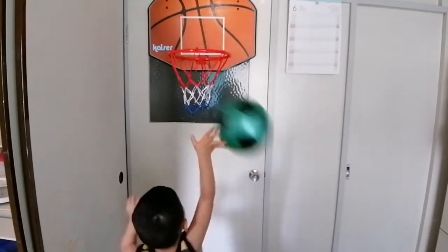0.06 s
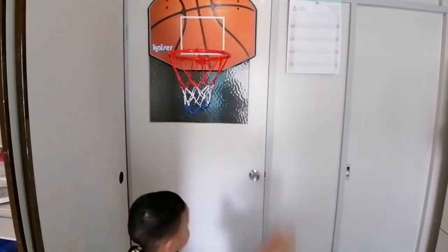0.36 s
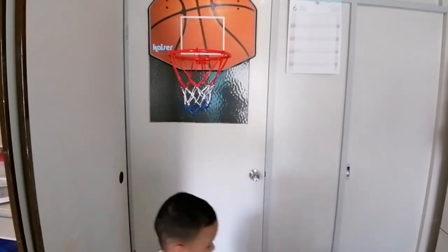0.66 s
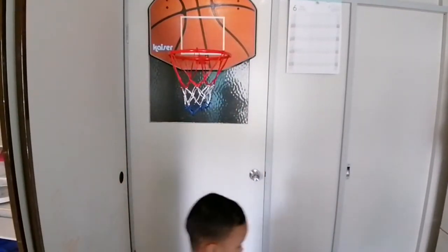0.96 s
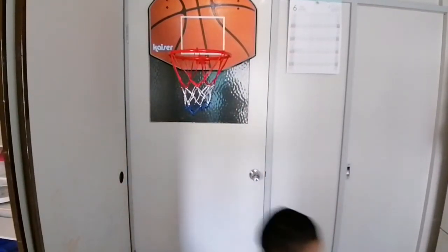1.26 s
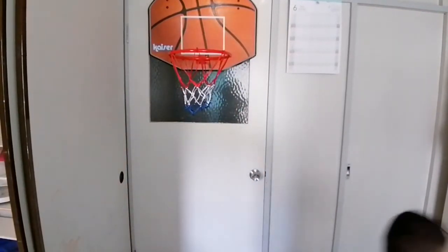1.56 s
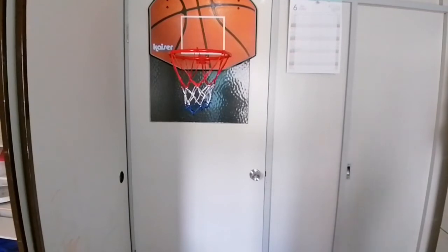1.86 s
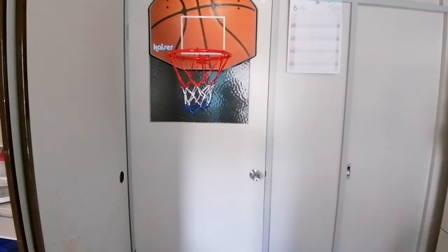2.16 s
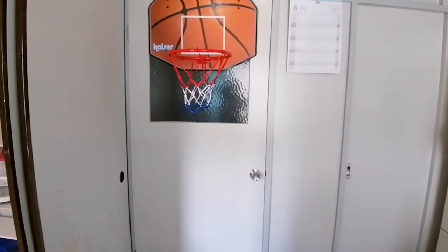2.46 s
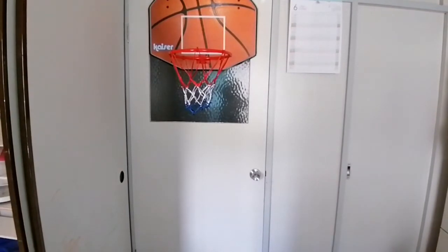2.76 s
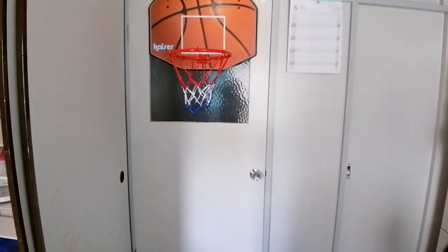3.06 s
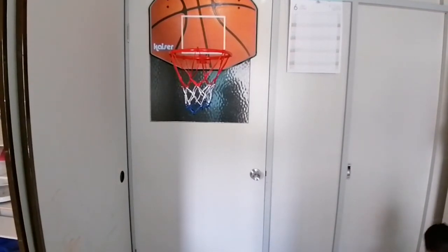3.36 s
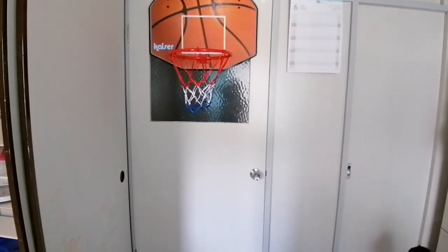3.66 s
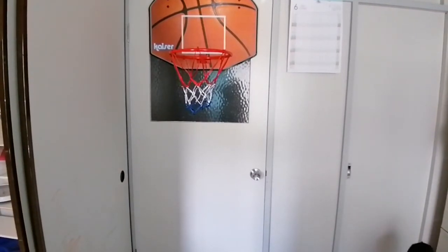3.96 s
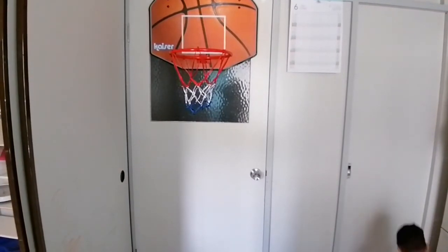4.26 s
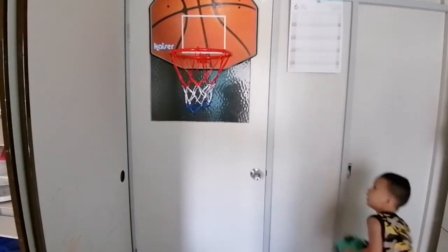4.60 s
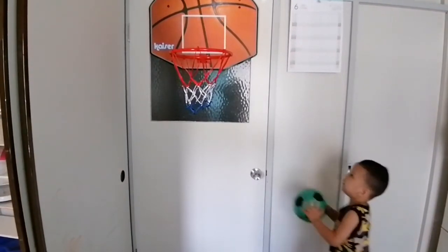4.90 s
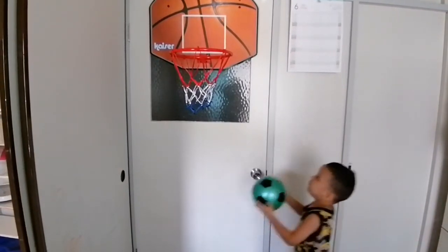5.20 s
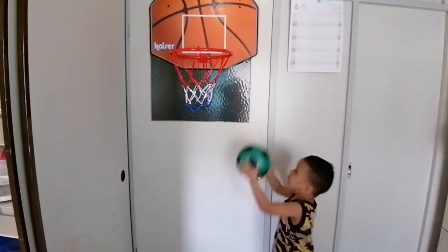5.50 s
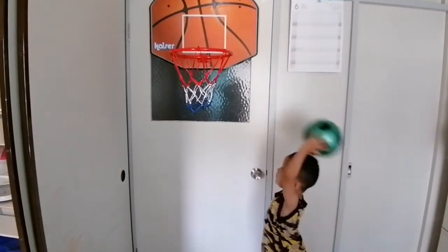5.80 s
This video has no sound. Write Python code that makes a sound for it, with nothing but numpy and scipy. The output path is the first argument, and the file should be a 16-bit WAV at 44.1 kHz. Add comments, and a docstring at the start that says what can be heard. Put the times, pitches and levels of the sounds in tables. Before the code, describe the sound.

A toy backboard knocks against a door, an inflatable ball bounces, and a child's bare footsteps and ball pats follow indoors.

```python
"""A small hard room, heard in stereo: a child plays with a light inflatable ball and a toy hoop on a door.
The ball brushes off the rim, leaves the backboard knocking on the door and bounces three times.
Bare feet thud, scuff and stamp after it, cloth rustles, and hands gather the ball and pat it.
Slaps reach the microphone mostly off the walls; the weight behind them sets the room's low modes booming.
A few dry ticks sound close by, and still air lies under it all."""
import sys
import numpy as np
from scipy import signal
from scipy.fft import rfft, irfft, next_fast_len
from scipy.io import wavfile
from scipy.ndimage import uniform_filter1d

SR = 44100
rng = np.random.default_rng(int(sys.argv[2]) if len(sys.argv) > 2 else 0)


def put_to_file(sound):
    """Save the sound as 16-bit audio at rate SR, in the file named by the first command-line argument."""
    columns = np.atleast_2d(sound).T  # one column per channel
    safe = np.clip(columns, -1, 1)
    whole_steps = np.round(safe * 32767)
    wavfile.write(sys.argv[1], SR, whole_steps.astype(np.int16))


N = 261907
TAIL = 32768   # samples for one contact to die away
TIME, AGE = np.arange(N) / SR, np.arange(TAIL) / SR   # s into the scene, s into a contact
WEIGHT_AFTER_S = 0.01797   # the weight arrives after the heel
SWING_CENTRE_S = 0.02   # from the start of a pressure swing to its middle

# decay of the walls' reflections: f/Hz, t60/s
ROOM_T60 = [(60, 0.56), (160, 0.42), (420, 0.36), (1100, 0.28), (2900, 0.41), (7700, 0.27), (14000, 0.32)]
# low modes of floor, door and room, then of the air inside the ball: f/Hz, level/dB, t60/s
ROOM_MODES = [(64, -14, .6), (74, -15, 0.44), (100.2, -2, 0.8), (124.4, -35, .45), (146.4, -16, 0.75),
              (171.6, -2.5, 0.3), (248, -34, 0.62), (330, -19, 1), (372, -57.5, .35)]
BALL_MODES = [(1500, 10.5, 0.061), (2420, -26, .1), (3340, -13, .08)]
# hollow ring of floor and door under a blow: f/Hz, width/Hz, lift/dB
HOLLOW_RING = [(386, 40, -1.5), (470, 29, 2), (569, 10, 6.5), (693, 6.7, 5), (946, 14, 4), (1019, 46, 4.5),
               (1286, 55, -5), (1696, 46, 3.5), (2420, 39, 2.5), (2540, 31, 5.5), (2883, 62, 4),
               (2834, 70, 2)]
# stereo width at the microphone: f/Hz, side minus mid/dB
MIC_WIDTH = [(50, -13), (150, -12.5), (280, -9.5), (500, -6.5), (1000, 0), (16000, 0.5)]
# balance at the microphone (pan is left minus right throughout): f/Hz, pan/dB
MIC_BALANCE = [(50, 0.5), (150, -3), (400, -1), (1000, -0.5), (2200, 0), (5000, 0), (14000, -1)]
# spectra of still air, cloth and sliding contacts: f/Hz, level/dB
AIR_COLOUR = [(15, -25), (25, -2), (53, -2.5), (70, -24.5), (92, -5), (301, -19.5), (326, -14), (516, -20),
              (754, -17.5), (936, -21), (1370, -19), (1480, -24), (1840, -21), (10400, -43.5),
              (16000, -58.5)]
RUSTLE_COLOUR = [(1000, -17), (3000, 7), (5500, 0.5), (7000, 4.5), (8000, -7), (9300, 5.5), (11000, -0.5),
                 (12500, -22), (16000, -17)]
RUB_COLOUR = [(150, -18), (500, 0.5), (1200, -17), (1370, -0.5), (1480, 9.5), (1650, -9.5), (3800, -15),
              (5000, -15.5), (6200, -23), (10000, -34), (14000, -54)]
SCUFF_COLOUR = [(80, -17), (300, 2), (650, 4), (1000, -17), (1450, -12), (2500, -23), (5500, -37),
                (10000, -26), (16000, -71)]
RIM_COLOUR = [(60, -4), (250, -5), (550, -1.5), (900, -8.5), (1500, -16), (3000, -20.5), (7000, -32.5),
              (10500, -30.5), (13000, -50), (16000, -58)]
# spectra of sharp contacts: f/Hz, level/dB
HAND_COLOUR = [(40, -14), (105, 4), (240, 4.5), (340, 1.5), (500, -13), (1000, -19), (1800, -28.5),
               (3200, -32), (6000, -41), (10500, -47.5), (12500, -58), (16000, -73)]
HEEL_COLOUR = [(60, -4.5), (200, 4.5), (380, -2.5), (600, -10), (1000, -17.5), (1600, -22.5), (3000, -24),
               (6000, -35), (10500, -35), (12500, -44), (16000, -64)]
SOLE_COLOUR = [(60, 12.5), (250, 4.5), (420, -4), (680, -9.5), (1300, -2.5), (2100, -7.5), (3100, -10.5),
               (4000, -18.5), (5200, -19), (7000, -25), (10500, -23.5), (12500, -38), (16000, -44.5)]
BALL_COLOUR = [(30, -1), (100, 3.5), (170, -2.5), (270, -0.5), (450, -4.5), (700, -6.5), (1200, -7.5),
               (2600, -9.5), (5000, -16.5), (10000, -21), (12500, -29), (16000, -48)]
PLASTIC_COLOUR = [(100, 5), (350, 8), (700, 1.5), (1400, -5.5), (2300, -2), (3500, -12), (5200, -11),
                  (7000, -13), (10500, -21.5), (13000, -31), (16000, -47)]
# course of each sliding contact: t/s, level/dB
BALL_RUB = [(3.3, -60), (3.335, -51), (3.365, -47), (3.41, -51.5), (3.46, -62)]
FOOT_SCUFF = [(2.485, -55), (2.512, -40.5), (2.53, -39.5), (2.55, -52), (2.58, -47), (2.65, -67),
              (2.73, -89)]
RIM_BRUSH = [(.008, -76), (.02, -42), (.09, -43), (.125, -41), (.16, -54), (.3, -77)]
# cloth brushing as the child turns and reaches: t/s, level/dB, hold/s
REACHES = [(2.1, -60.5, .005), (2.21, -54, 0.0093), (2.49, -61, 0.15), (4.57, -67, .005), (5.26, -71, .1),
           (5.53, -64, .03)]
# dry ticks near the microphone: t/s, peak/dB
TICKS = [(3.551, -44), (3.563, -34.5), (3.574, -39), (4.971, -31), (5.399, -29)]
# dull low floor thuds, some under or just after a step or bounce, some alone:
# t/s, push/dB, push/Hz, boom/dB, boom/Hz, pan/dB
FLOOR_THUDS = [(.798, -31, 123, -32.5, 159, -3.5), (2.213, -18.5, 90, -38, 235, -2),
               (2.439, -39, 110, -48, 156, 4), (3.187, -38, 290, -35.5, 303, -5),
               (3.236, -41.5, 290, -39.5, 158, -2)]
# hands on the ball (swell: the reflections' build-up; spot: the resonance of the place struck):
# t/s, slap/dB, tilt/(dB/octave), swell/s, spot/Hz, push/dB, push/Hz, boom/dB, boom/Hz, pan/dB
PATS = [(2.173, -36.5, 4, 0.012, 895, -28, 105, -22, 160.7, -6),
        (4.9704, -43.5, 6.5, 0.0037, 3500, -25, 64, -27, 152.8, -2),
        (5.3425, -46, 5.5, 0.00081, 3830, -60, 130, -57, 160, 0),
        (5.399, -28.5, 2.5, 0.00048, 806, -25.5, 145, -23.5, 325, 0),
        (5.655, -60, 7, 0.0032, 3260, -44.5, 83, -60, 148, 1)]
# bare feet: t/s, slap/dB, swell/s, spot/Hz, push/dB, push/Hz, boom/dB, boom/Hz, toes/dB, pan/dB
STEPS = [(1.875, -45, 0.015, 324, -23.5, 100, -20.5, 166, -29.5, -0.5),
         (2.213, -28, 0.0087, 276, -17, 136, -8.5, 151.3, -19.5, 3),
         (2.403, -46, .0006, 540, -42, 109, -53, 158, -56, -2),
         (2.972, -48.5, 0.0088, 810, -39.5, 72, -36.5, 162, -57, 0),
         (3.348, -55, .002, 530, -50, 70.4, -39.5, 315, -48, -4),
         (3.478, -34.5, 0.0058, 455, -14.5, 82.4, -15, 153.8, -30, -4),
         (3.5445, -47, 0.0092, 350, -27.5, 145, -30, 90.2, -47, 3)]
# slaps of a flat sole, of the ball on the floor and of the plastic rim and net:
# t/s, level/dB, tilt/(dB/octave), swell/s, spot/Hz, spot lift/dB
STAMP = [(3.6805, -24, 0, 0.0014, 2720, 3)]
BOUNCES = [(.6925, -26.5, 0.5, 0.0015, 466, 3), (1.5015, -27, 0, 0.0049, 547, 3.5),
           (2.117, -30.5, -0.14, 0.0021, 790, 1)]
# (the rattles share one tilt and swell) t/s, level/dB, spot/Hz, spot lift/dB
RATTLES = [(.124, -43, 5300, 5), (.195, -47, 2100, 3), (.235, -44.5, 269, 15), (.288, -47, 2080, 6.5),
           (.368, -55.5, 854, 11), (.446, -52.5, 807, 0)]
# thuds behind a stamp and a bounce, relative to the slap:
# delay/s, push/dB, push/Hz, boom/dB, boom/Hz, pan/dB
STAMP_WEIGHT = [(.009, 4, 86, 13.5, 167.8, -4)]
BOUNCE_WEIGHT = [(.009, 5, 390, -13, 563, -5), (.052, 1, 141, -3.5, 159.7, 1.5)]
# backboard swinging against the door: t/s, level/dB
KNOCKS = [(.074, -30.5), (0.1477, -21), (0.2197, -23.5), (0.3133, -23.5), (.381, -28.5), (0.465, -27),
          (0.528, -36.5), (0.587, -40.5)]


def from_db(db):
    """Decibels to gain."""
    return 10 ** (np.asarray(db) / 20)


def rms(x):
    """Root mean square."""
    return np.sqrt(np.mean(x ** 2) + 1e-20)


def at_hz(points, hz):
    """Read a table on a log-frequency axis."""
    f, value = np.transpose(points)
    return np.interp(np.log(hz), np.log(f), value)


def bins(size):
    """Frequencies of an FFT, kept above zero."""
    return np.maximum(np.fft.rfftfreq(size, 1 / SR), 10)


def add(out, s, sound):
    """Mix a sound in, starting at time s."""
    start = max(round(s * SR), 0)
    out[:, start:start + sound.shape[-1]] += sound[..., :N - start]


def wander(size, spans):
    """A random curve of rms 1, smoothed over each span of points in turn."""
    curve = rng.standard_normal(size)
    for span in spans:
        curve = uniform_filter1d(curve, size=span)
    return curve / rms(curve)


def diffuse(size):
    """Spectrum of white noise from all sides: left and right are alike in the bass only."""
    mid, side = rfft(rng.standard_normal((2, size)))
    width = from_db(at_hz(MIC_WIDTH, bins(size)))
    return (mid + side * width * [[1], [-1]]) / np.sqrt(1 + width ** 2)


def noise(colour):
    """Steady stereo noise of a given colour, rms 1."""
    size = next_fast_len(N)
    x = irfft(diffuse(size) * from_db(at_hz(colour, bins(size))), size)[:, :N]
    return x / rms(x)


def room_tone():
    """Still air, faint and all round the microphone."""
    return from_db(-54) * noise(AIR_COLOUR)


def reflections(swell_s):
    """The walls' answer from one spot: it builds up, then each octave dies at its own rate; energy 1."""
    field = diffuse(TAIL)
    octave = np.clip(np.log2(bins(TAIL) / 60), 0, 8)
    tail = 0
    for k in range(9):
        band = irfft(field * np.maximum(1 - abs(octave - k), 0))
        tail = tail + band * from_db(-60 * AGE / at_hz(ROOM_T60, 60 * 2 ** k))
    tail *= 1 - np.exp(-AGE / swell_s)
    return tail / (rms(tail) * np.sqrt(TAIL))


def ring(hz, t60):
    """One mode dying away."""
    return np.sin(2 * np.pi * hz * AGE) * from_db(-60 * AGE / t60)


def coloured(x, colour, tilt_db, spot_hz, spot_db):
    """Shape a contact by its skin, the hollow resonances and the ripple of nearby surfaces."""
    hz = bins(TAIL)
    db = at_hz(colour, hz) + tilt_db * np.log2(np.clip(hz, 150, 9000) / 1000)
    resonances = [*HOLLOW_RING, (spot_hz, 0.32 * spot_hz, spot_db)]
    db += sum(lift / (1 + (2 * (hz - f) / width) ** 2) for f, width, lift in resonances)
    db += 1.6 * wander(len(hz), spans=(70, 50)) * np.minimum(hz / 1000, 1)
    # minimum phase, so nothing sounds ahead of the contact
    cepstrum = irfft(np.log(from_db(db)))
    cepstrum[1:TAIL // 2] *= 2
    cepstrum[TAIL // 2 + 1:] = 0
    response = irfft(np.exp(rfft(cepstrum)))[None, :TAIL // 4]
    return signal.fftconvolve(x, response, axes=1)[:, :TAIL]


def slaps(rows, colour, direct_db, ball_db=None):
    """Sharp contacts: a click, the walls, and the ping of the ball's air if it is struck."""
    out = np.zeros((2, N))
    click = from_db(direct_db) * np.exp(-AGE[:TAIL // 64] / .0002)   # soft skin dulls it
    for s, level_db, tilt_db, swell_s, spot_hz, spot_db in rows:
        hit = reflections(swell_s)
        hit[:, :len(click)] += click
        if ball_db is not None:
            ping = sum(from_db(ball_db + db) * ring(hz, t60) for hz, db, t60 in BALL_MODES)
            hit += signal.fftconvolve(hit, ping[None], axes=1)[:, :TAIL]
        hit = coloured(hit, colour, tilt_db, spot_hz, spot_db)
        add(out, s, from_db(level_db) * hit / rms(hit[:, :SR // 20]))   # level over the first 50 ms
    return out


def push(swing_hz, cycles, modes_db, wet_db):
    """One soft pressure swing that wakes the low modes and the walls."""
    phase = swing_hz * (AGE[:SR // 20] - SWING_CENTRE_S)
    envelope = np.exp(-(phase / cycles) ** 2) * signal.windows.tukey(len(phase), .3)
    swing = -np.cos(2 * np.pi * phase) * envelope
    room = from_db(wet_db) * reflections(swell_s=0.0057)
    room += sum(from_db(modes_db + db) * ring(hz, t60) * 2 * hz / SR for hz, db, t60 in ROOM_MODES)
    room[:, 0] += 1   # direct path to the microphone
    return signal.fftconvolve(room, swing[None], axes=1)[:, :TAIL]


def thuds(rows, boom_cycles=43, boom_rise_s=0.0062, roughness=0.63):
    """Weight lands with a push, and the room mode strongest at that spot booms; high booms die sooner."""
    out = np.zeros((2, N))
    for s, push_db, push_hz, boom_db, boom_hz, pan_db in rows:
        sides = from_db(pan_db * np.array([[.5], [-.5]]))
        thump = from_db(push_db) * push(push_hz, cycles=0.82, modes_db=-15, wet_db=-3.5)
        rise = (1 - np.exp(-AGE / boom_rise_s)) ** 2
        boom = from_db(boom_db) * ring(boom_hz, boom_cycles / boom_hz) * rise
        flutter = wander(TAIL, spans=(500, 400))   # returning echoes swell and thin the boom
        boom *= 1 + roughness * np.minimum(AGE * 20, 1) * flutter
        add(out, s - SWING_CENTRE_S, sides * thump)
        add(out, s - 1.75 / boom_hz, sides * boom)   # 1.75 cycles early: in step with the push
    return out


def weight_behind(contacts, weight):
    """The thuds that follow each contact, in proportion to its strength."""
    return thuds([(s + delay_s, db + push_db, push_hz, db + boom_db, boom_hz, pan_db)
                  for s, db, *_ in contacts
                  for delay_s, push_db, push_hz, boom_db, boom_hz, pan_db in weight])


def rustle(under_step_db=-26, rise_db_per_s=398, fall_db_per_s=265):
    """Cloth hisses with every step and reach: it swells, holds and fades."""
    strides = [(s, db + under_step_db, WEIGHT_AFTER_S) for s, db, *_ in STEPS]
    level_db = np.full(N, -120.)
    for s, db, held_s in [*REACHES, *strides]:
        rise = rise_db_per_s * np.maximum(s - TIME, 0)
        fall = fall_db_per_s * np.maximum(TIME - s - held_s, 0)
        level_db = np.maximum(level_db, db - rise - fall)
    return from_db(level_db) * noise(RUSTLE_COLOUR)


def slide(curve, colour, grain_db):
    """Sliding surfaces catch and let go, so the hiss comes in grains."""
    s, db = np.transpose(curve)
    level_db = np.interp(TIME, s, db, left=-120, right=-120)
    grip = wander(N, spans=(220,))
    return from_db(level_db + grain_db * grip) * noise(colour)


def ticks(t60=0.0091, band_hz=(6000, 11000)):
    """Tiny bright snaps, so near the microphone that they come without the room."""
    out = np.zeros((2, N))
    band = signal.butter(4, band_hz, "band", fs=SR, output="sos")
    decay = from_db(-60 * AGE[:SR // 20] / t60)
    for s, peak_db in TICKS:
        snap = signal.sosfilt(band, rng.standard_normal((2, len(decay))) * decay)
        add(out, s, from_db(peak_db) * snap / abs(snap).max())
    return out


def pats(spot_db=5, dent_after_s=0.0137):
    """A hand slaps the ball, which gives way just afterwards with a soft thud."""
    palms, dents = [], []
    for s, db, tilt_db, swell_s, spot_hz, *thud in PATS:
        palms.append((s, db, tilt_db, swell_s, spot_hz, spot_db))
        dents.append((s + dent_after_s, *thud))
    return slaps(palms, HAND_COLOUR, direct_db=-28, ball_db=-65) + thuds(dents)


def footsteps(spot_db=7.5, even_db=-38.5, toes_after_s=.041, toes_hz=170, toes_boom_hz=313):
    """Bare feet on the floor: the heel slaps, the weight lands, the toes follow."""
    heels, landings = [], []
    for s, db, swell_s, spot_hz, push_db, push_hz, boom_db, boom_hz, toes_db, pan_db in STEPS:
        tilt_db = 0.18 * (even_db - db)   # heavier steps are duller
        landing_s = s + WEIGHT_AFTER_S
        heels.append((s, db, tilt_db, swell_s, spot_hz, spot_db))
        landings.append((landing_s, push_db, push_hz, boom_db, boom_hz, pan_db))
        landings.append((landing_s + toes_after_s, toes_db, toes_hz, toes_db - 4.5, toes_boom_hz, 0))
    return slaps(heels, HEEL_COLOUR, direct_db=-27) + thuds(landings)


def stamp():
    """A flat foot traps air under the sole, and the weight comes down behind it."""
    return slaps(STAMP, SOLE_COLOUR, direct_db=-33) + weight_behind(STAMP, STAMP_WEIGHT)


def bounces():
    """The ball slaps down and pings; the floor knocks hollow, then the room booms."""
    return slaps(BOUNCES, BALL_COLOUR, direct_db=-36, ball_db=-51) + weight_behind(BOUNCES, BOUNCE_WEIGHT)


def backboard(knock_hz=122.3, kick_after_s=.024, kick_db=-12, kick_hz=155):
    """The board bumps the door about thirteen times a second, dying away; each time the door kicks back."""
    out = np.zeros((2, N))
    for s, db in KNOCKS:
        for at, level_db, hz in (s, db, knock_hz), (s + kick_after_s, db + kick_db, kick_hz):
            bump = from_db(level_db) * push(hz, cycles=0.58, modes_db=-11, wet_db=-5)
            add(out, at - SWING_CENTRE_S, bump)
    return out


def rim_rattle(tilt_db=-0.68, swell_s=0.00091):
    """The plastic rim and net rattle as the board swings."""
    rattles = [(s, db, tilt_db, swell_s, spot_hz, spot_db) for s, db, spot_hz, spot_db in RATTLES]
    return slaps(rattles, PLASTIC_COLOUR, direct_db=-29)


def scene():
    """Hoop, ball, feet and hands over the still air of the room."""
    hoop = backboard() + rim_rattle() + slide(RIM_BRUSH, RIM_COLOUR, grain_db=2)
    floor = bounces() + stamp()
    rubbing = slide(BALL_RUB, RUB_COLOUR, grain_db=1) + slide(FOOT_SCUFF, SCUFF_COLOUR, grain_db=-0.5)
    child = rustle() + footsteps() + thuds(FLOOR_THUDS) + pats()
    return hoop + floor + rubbing + child + ticks() + room_tone()


def record(dry, cutoff_hz=15300):
    """The stereo microphone hears more bass on the right; the top is cut."""
    size = next_fast_len(N + TAIL)
    sides = from_db(at_hz(MIC_BALANCE, bins(size)) * np.array([[.5], [-.5]]))
    leaning = irfft(rfft(dry, size) * sides, size)[:, :N]
    return signal.sosfilt(signal.ellip(10, .1, 80, cutoff_hz, fs=SR, output="sos"), leaning)


dry = scene()
out = record(dry)
put_to_file(out)
```